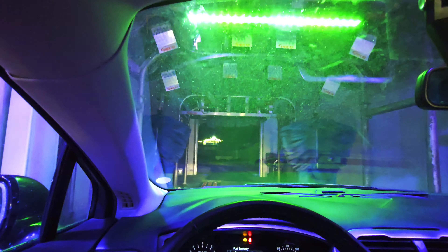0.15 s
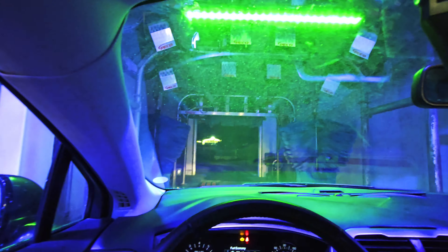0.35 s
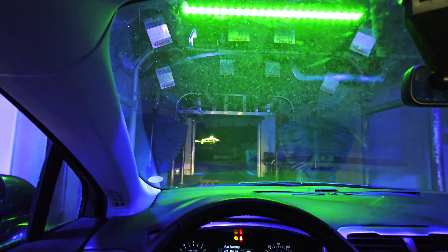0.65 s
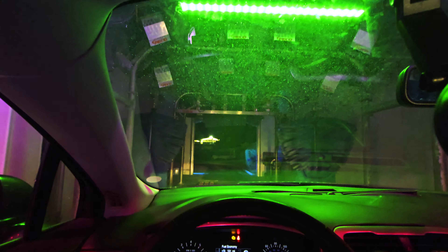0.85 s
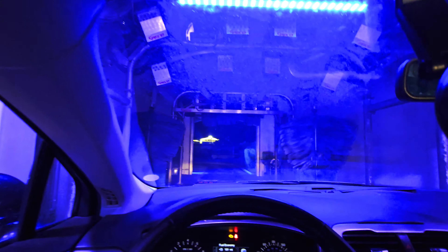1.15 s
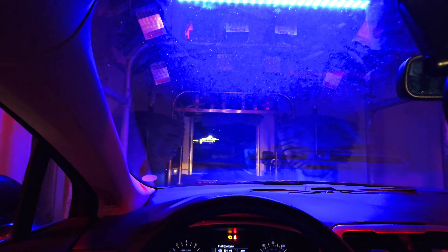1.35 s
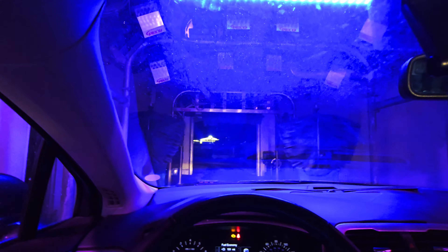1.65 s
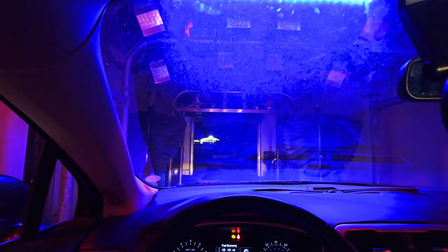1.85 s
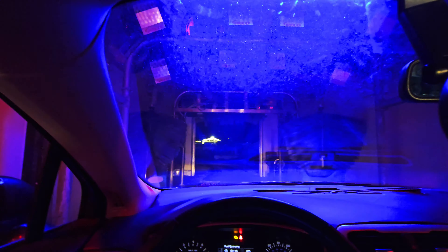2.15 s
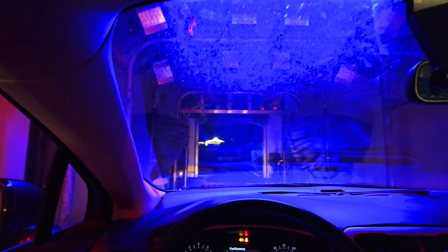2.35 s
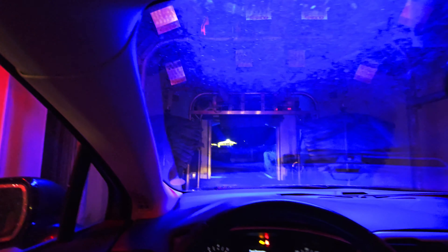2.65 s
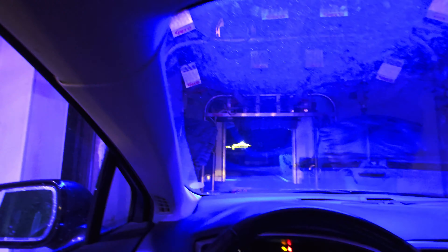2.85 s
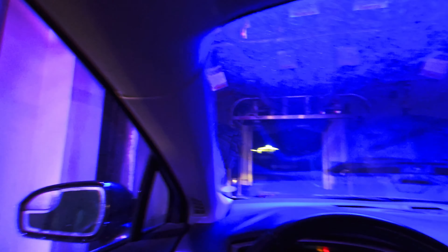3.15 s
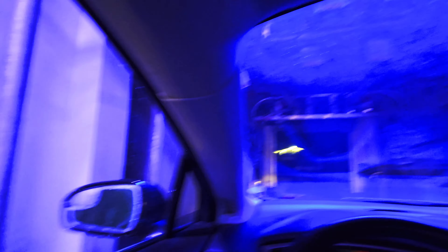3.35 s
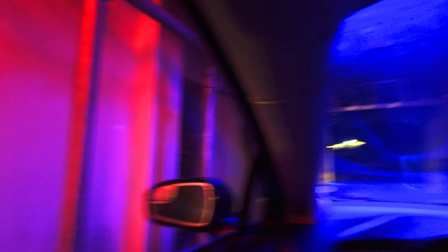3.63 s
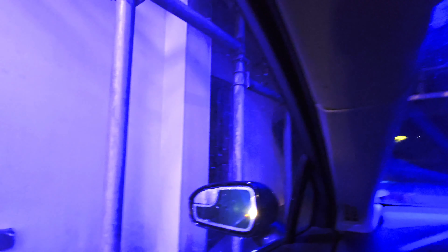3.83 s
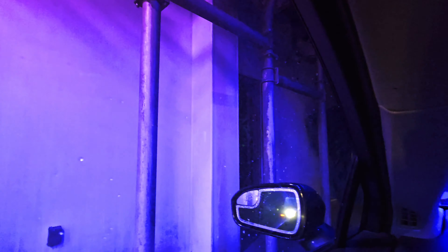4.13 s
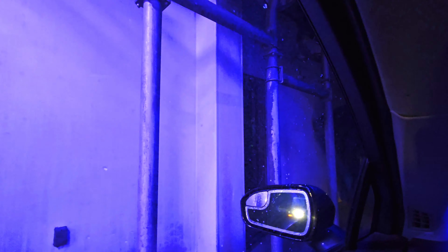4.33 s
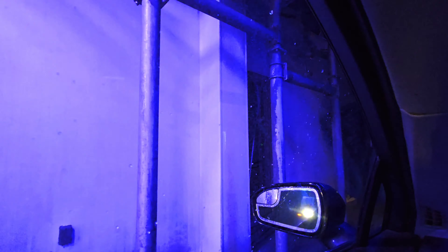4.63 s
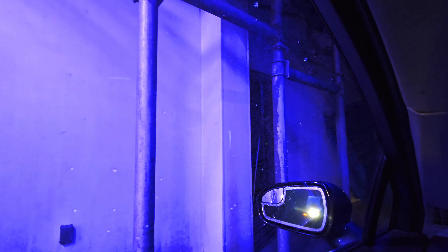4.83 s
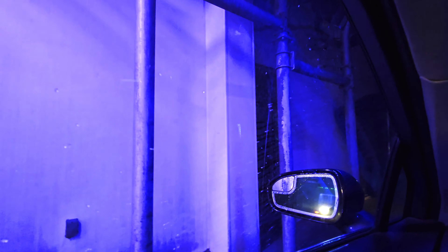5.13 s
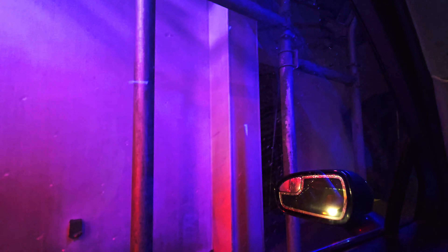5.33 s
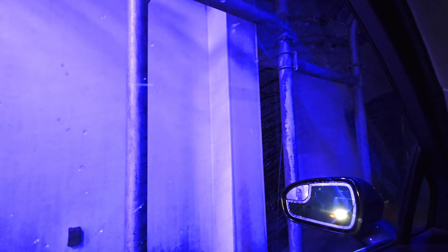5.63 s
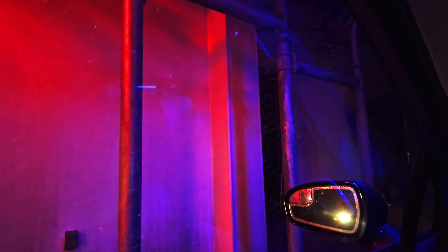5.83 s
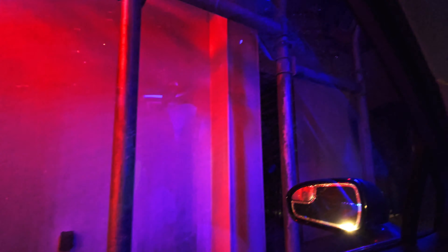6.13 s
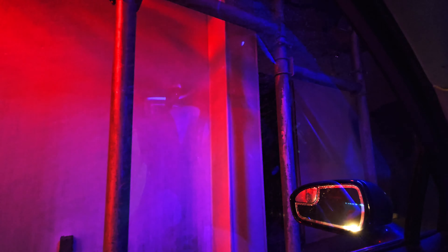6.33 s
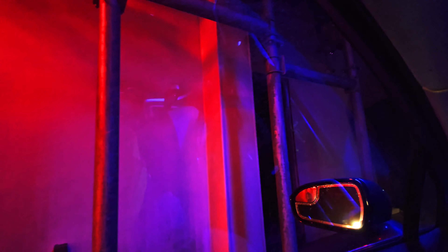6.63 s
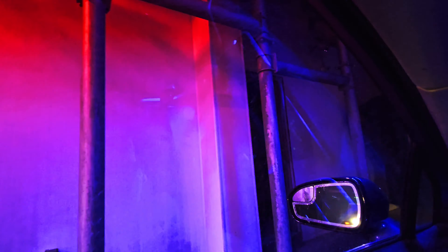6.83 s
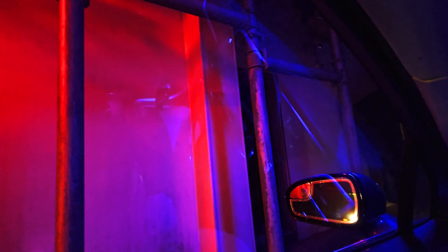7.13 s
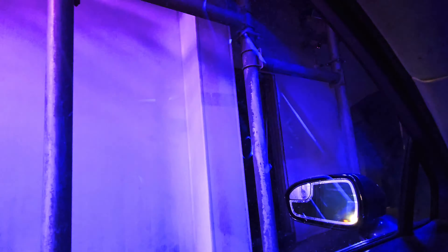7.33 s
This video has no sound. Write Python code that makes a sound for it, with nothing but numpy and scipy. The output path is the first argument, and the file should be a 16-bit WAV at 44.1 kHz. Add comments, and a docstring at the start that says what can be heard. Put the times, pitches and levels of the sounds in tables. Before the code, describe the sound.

From 0 seconds the noise is already full: air jets strike the windscreen with a broad fluttering roar, strongest in the first half second, over a low cabin boom and body drumming. Nozzle rush and softer hiss on wet glass lie above, with a wavering fan whine around 700 hertz and a second, slightly higher fan beating against it. From 1 to 2 seconds the roar thins while the boom becomes much heavier and gusty. A faint, fuzzy, high whistle lasts an instant near 2. Rush swells around 2.5 and the whine briefly stands out. From 3 to 4 the microphone turns toward the side window; hiss and tiny droplet ticks grow slightly clearer. Roof drumming deepens and strengthens through 6.5, with rush surging near 4.5. The fan tones keep swelling, sinking and shifting sideways. Everything continues steadily to the end at about 7.4 seconds.

```python
"""Inside a car that creeps under the dryer blowers of a wash tunnel.
Air jets make the cabin boom, roar on the windscreen and drum harder as they move onto the roof: shaped noise.
Through the glass come the rush and hiss of the nozzles (noise), the whine of two fans (wavering tones),
a fine spray of water (tiny clicks) and one brief whistle (a narrow band of noise)."""
import sys
import numpy as np
from scipy import signal
from scipy.fft import rfft, irfft
from scipy.io import wavfile
from scipy.ndimage import uniform_filter1d, minimum_filter1d

SR = 44100
rng = np.random.default_rng(int(sys.argv[2]) if len(sys.argv) > 2 else 0)


def wav_out(sig):
    """Save sig, one row per channel (or a flat mono array), as 16-bit PCM at SR to the path in sys.argv[1]."""
    wavfile.write(sys.argv[1], SR, np.round(np.clip(np.atleast_2d(sig).T, -1, 1) * 32767).astype(np.int16))


N = 329427
TIME = np.arange(N) / SR
HZ = np.fft.rfftfreq(N, 1 / SR)
HALVES = np.array([[.5], [-.5]])  # splits a difference evenly between left and right


def gain_of(db):
    """Turns decibels into an amplitude factor."""
    return 10 ** (np.asarray(db) / 20)


def evened(x):
    """Scales a sound to rms 1."""
    return x / np.sqrt(np.mean(x ** 2) + 1e-20)


def curve(rows, column=1):
    """Reads one column of a timed table at every sample, joined by straight lines."""
    columns = np.transpose(rows)
    return np.interp(TIME, columns[0], columns[column])


def read(points, hz):
    """Reads a spectrum, joined by straight lines over log frequency."""
    f, value = np.transpose(points)
    return np.interp(np.log(hz + 1), np.log(f + 1), value)


def wander(rate_hz):
    """A smooth random drift of rms 1, with little movement faster than the given rate."""
    coarse = TIME[::100]  # slow movement needs few points
    hz = np.fft.rfftfreq(len(coarse), coarse[1])
    spectrum = rfft(rng.standard_normal(len(coarse)))
    spectrum = spectrum * np.exp(-(hz / rate_hz) ** 2) * (hz > 0)
    slow = irfft(spectrum, len(coarse))
    return np.interp(TIME, coarse, evened(slow))


def steadied(x, seconds):
    """Evens out the loudness of a noise to about rms 1 over the given time."""
    power = uniform_filter1d(x.mean(0) ** 2, max(int(seconds * SR), 1))
    return x / np.sqrt(power + 1e-9)


def panned(x, left_db):
    """Leans a stereo pair to the left by a level difference."""
    return x * gain_of(HALVES * left_db)


def blend(first, second, share):
    """Passes from one noise to another at even power."""
    share = np.clip(share, 0, 1)
    return np.sqrt(1 - share) * first + np.sqrt(share) * second


def band(x, hz, width_hz):
    """Keeps the part of a sound around one frequency."""
    return irfft(rfft(x) * np.exp(-((HZ - hz) / width_hz) ** 2), N)


def hump(at_s, length_s, order=2):
    """A smooth rise to 1 and fall back; a higher order holds the top."""
    distance = np.minimum(abs(2 * (TIME - at_s) / length_s), 10)
    return np.exp(-distance ** order)


# how alike the two channels are in the cabin, where sound comes from all around: (frequency [Hz], coherence)
LIKENESS = [(40, 0.92), (130, 1), (290, 0.75), (630, 0.38), (1000, -0.013), (1390, -0.44), (2200, 0.24),
            (3050, -0.038), (6700, -0.0068), (14700, .01)]


def air(spectrum, skirt_db):
    """Turbulent noise at two ports, falling by skirt_db an octave outside its spectrum."""
    a, b = rfft(rng.standard_normal((2, N)))
    same = np.clip(read(LIKENESS, HZ), -1, 1)
    pair = np.array([a, same * a + np.sqrt(1 - same ** 2) * b])
    nearest_hz = np.clip(HZ, spectrum[0][0], spectrum[-1][0])
    octaves_outside = abs(np.log2((HZ + 1) / (nearest_hz + 1)))
    x = irfft(pair * gain_of(read(spectrum, HZ) - skirt_db * octaves_outside), N)
    return x / np.std(x.mean(0))


# the strongest gusts and lulls:
# (time [s], length [s], cabin boom [dB], roof drumming [dB], windscreen roar [dB])
GUST_TIMES = [(0.358, 0.72, 3, 1.5, -1.5), (0.727, 0.22, -8, -1.5, 3.5), (1.302, .2, 4.5, 0, 1.5),
              (1.5, .14, -3.5, -0.5, 0), (1.73, .35, 4, -3.5, -0.5), (2.245, 0.25, -4.5, 3, 1),
              (2.528, .2, 5.5, 1.5, 1), (2.757, 0.22, 8, 2, 0.5), (3.312, .18, -5.5, -0.5, -1),
              (3.52, 0.33, 2.5, 1.5, 1), (3.95, 0.23, 4.5, -0.5, 1.5), (4.167, 0.3, -2.5, 2.5, 1.5),
              (4.45, 0.48, 0.5, 1, 4), (4.944, .14, 2.5, 2, 2), (5.9, 0.68, -0.5, 2.5, 2),
              (6.463, 0.3, -1, 4, 1), (6.85, 0.5, 4.5, 0, 2), (7.054, .16, -4, 1, 0),
              (7.328, 0.48, 0, 2, 3.5)]


def gusts(column):
    """Gusts and lulls of the jets, in dB, on the part of the car in that column."""
    return sum(row[column] * hump(row[0], row[1]) for row in GUST_TIMES)


# how far the jets have moved from the windscreen onto the roof: (time [s], share [0-1])
JET_TRAVEL = [(0, 0), (1, 0.03), (2, 0.17), (3, 0.19), (4, 0.61), (5.5, 0.83), (6.4, 1), (7.4, 0.87)]


def off_glass():
    """How far the jets have left the windscreen, 0-1; they are off it early in their travel."""
    return np.clip(4.63 * curve(JET_TRAVEL), 0, 1)


# the low boom of the cabin: (frequency [Hz], relative level [dB per Hz])
CABIN_BOOM = [(20, -20.5), (30, -2.5), (38, 2), (45, 7.5), (53, -2), (66, -5.5)]


def buffeting(level_db=-26.0, rise_db=8.5, gusty_db=1.5, gusty_hz=14):
    """Gusts push on the body, harder off the glass, and the enclosed air booms at its lowest resonance."""
    boom = steadied(air(CABIN_BOOM, skirt_db=30), seconds=.09)
    push_db = level_db + rise_db * off_glass() + gusts(column=2) + gusty_db * wander(gusty_hz)
    return boom * gain_of(push_db)


# drumming with the jets at the front, then on the roof: (frequency [Hz], relative level [dB per Hz])
FRONT_PANELS = [(66, -12.5), (85, -10), (100, -8.5), (117, 0.5), (150, -6), (175, -1.5), (215, -8.5),
                (270, -11.5), (330, -22.5)]
ROOF_PANELS = [(62, -4.5), (79, 5), (102, -3.5), (135, -2), (170, -3.5), (210, -9), (243, -6), (300, -12),
               (360, -16.5)]
# the microphone turns from the windscreen to the side window: (time [s], share [0-1])
MIC_TURN = [(2.9, 0.29), (4, 0.7), (5.8, 1), (7.4, 0.55)]


def roof(level_db=-22.5, rise_db=4.0, gusty_db=0.5, gusty_hz=3, lean_db=3.5):
    """The body drums under the jets; other panels take over, louder, as the jets travel onto the roof."""
    front = air(FRONT_PANELS, skirt_db=36)
    overhead = air(ROOF_PANELS, skirt_db=42.0)
    drum = blend(front, overhead, curve(JET_TRAVEL))
    push_db = level_db + rise_db * curve(JET_TRAVEL) + gusts(column=3) + gusty_db * wander(gusty_hz)
    drum = steadied(drum, seconds=0.18) * gain_of(push_db)
    # long waves fill the cabin evenly; shorter ones come from the side window
    window = band(drum, hz=252, width_hz=69)
    return drum - window + panned(window, lean_db * curve(MIC_TURN))


# roar with the jets at the front, then on the roof: (frequency [Hz], relative level [dB per Hz])
FRONT_ROAR = [(310, 0), (352, 3), (395, -4.5), (445, -0.5), (510, -6), (580, -14.5), (690, -13.5),
              (850, -16.5), (950, -29)]
LATER_ROAR = [(320, -2.5), (400, -2.5), (470, -3), (570, -6), (660, -4), (760, -9), (850, -10.5),
              (950, -17)]


def windscreen(level_db=-34.0, fall_db=-5.0, head_on_db=9.5, head_on_s=0.57,
               follow=0.14, flutter_db=0.5, front_db=0.5):
    """The jets break on the glass with a fluttering roar, strong head on and thinning as they move on."""
    front = gain_of(front_db) * air(FRONT_ROAR, skirt_db=43.5)
    later = air(LATER_ROAR, skirt_db=42.0)
    roar = blend(front, later, off_glass())
    passing_db = head_on_db * np.exp(-(TIME / head_on_s) ** 2) + fall_db * curve(JET_TRAVEL)
    # follow: dB of roar per dB of nozzle rush
    stir_db = gusts(column=4) + follow * surge() + flutter_db * wander(2.7)
    return roar * gain_of(level_db + passing_db + stir_db)


# the nozzles, before the trims below: (time [s], rush level [dB], level of hiss on wet glass [dB])
NOZZLE_LEVELS = [(0.1, -45.5, -55.5), (1.14, -45.5, -55), (1.24, -42.5, -52.5), (1.7, -43.5, -53),
                 (1.95, -44, -53), (2.3, -43, -51.5), (2.5, -41.5, -51), (2.74, -43, -51.5),
                 (2.95, -45, -54), (3.72, -46, -54), (3.9, -45.5, -52.5), (4.36, -45, -53),
                 (4.48, -42, -51), (4.62, -45, -53.5), (5.3, -44.5, -54), (5.8, -44.5, -53.5),
                 (6.5, -44, -52.5), (7.05, -45, -52), (7.4, -44, -51)]
# their two sounds: (frequency [Hz], relative level [dB per Hz])
RUSH_SPECTRUM = [(900, -6), (1050, -1), (1250, 1), (1450, 3.5), (1600, 0), (1790, -6), (2150, -4.5),
                 (2360, -7), (2500, -6.5), (2750, -15)]
HISS_SPECTRUM = [(2700, -4), (3200, -4), (4300, -7.5), (5200, -9), (6000, -16), (6600, -18.5),
                 (7300, -17.5), (8000, -21.5), (9300, -21), (10500, -32.5), (12500, -28.5), (15000, -33)]


def nozzles(rush_trim_db=-0.57, hiss_trim_db=-2.0, flutter_db=0.5, leak_db=4.5):
    """Air tears out of the nozzles and hisses over the wet glass; both flutter together."""
    flutter = flutter_db * wander(21)
    rush = air(RUSH_SPECTRUM, skirt_db=38.5) * gain_of(curve(NOZZLE_LEVELS) + rush_trim_db + flutter)
    hiss_level = curve(NOZZLE_LEVELS, column=2) + hiss_trim_db + flutter
    hiss = air(HISS_SPECTRUM, skirt_db=45.5) * gain_of(hiss_level)
    # the thin side pane lets through a band where its bending waves match the sound in air
    leak = band(hiss, hz=3100, width_hz=790) * (gain_of(leak_db * curve(MIC_TURN)) - 1)
    return rush + hiss + leak


def surge():
    """The rush of the nozzles in dB above its mean."""
    rush = curve(NOZZLE_LEVELS)
    return rush - rush.mean()


def whine(turns, harmonic=1, lead=0., scatter_hz=9, rough_hz=30):
    """A blade tone at two ports: its direction drifts, wall echoes make it waver, turbulence roughens it."""
    swirl, echo = .42, .38  # drift of each port [radians rms], strength of the wall echoes
    rough = .16 * harmonic  # higher harmonics are smeared more
    drift = swirl * np.array([wander(0.94), wander(0.96)])
    direct = np.exp(1j * (HALVES * lead + drift))
    echoes = np.array([wander(scatter_hz) + 1j * wander(scatter_hz) for side in range(2)])
    eddies = np.array([wander(rough_hz) + 1j * wander(rough_hz) for side in range(2)])
    path = direct + echo * echoes + rough * eddies
    # the fan's power holds steady from moment to moment, however its tone flutters
    power = uniform_filter1d((abs(path) ** 2).mean(0), int(.1 * SR))
    return (path / np.sqrt(power) * np.exp(2j * np.pi * harmonic * turns)).real


# the harmonics of the blade rate, lowest first: (level [dB], gain once the jets are off the windscreen [dB],
# gain at the side window [dB], lift [dB per dB of nozzle rush], lead of the left port [radians])
BLADE_TONES = [(-46.5, 3.5, -2.3, 0.1, -0.2), (-55.5, 5.5, 4, -0.2, 2.4), (-61.5, 2, -0.5, 1.2, 0.5),
               (-65.5, 0, 3, 0.3, 1.4)]
# harmonics swell or sink where the car crosses loud or quiet spots of the fans' sound field:
# (time [s], length [s], harmonic [number], level change [dB], left-right difference [dB])
TONE_SWELLS = [(2.55, .6, 1, 7, 0), (2.42, .14, 1, 2.5, 0), (3.85, .4, 1, -8, 0), (4.28, .22, 1, 4, -4),
               (4.63, .3, 1, 6, 0), (4.98, .35, 1, 2.5, 7), (5.29, .14, 1, -10, 0), (5.98, .17, 1, 4, 8),
               (6.33, .24, 1, 5, 0), (6.65, .16, 1, -5, 0), (1.29, .3, 2, 8, 0), (1.97, .42, 2, 9.5, 1),
               (2.51, .16, 2, 9, 3), (3.87, .14, 2, 2, 5), (4.48, .11, 2, 3, 4), (4.18, .12, 2, -8, 0),
               (4.66, .13, 2, 6, 0), (4.83, .1, 2, 2.5, 4), (5.01, .15, 2, 4, 4), (6.23, .14, 2, 3.5, -3),
               (6.49, .22, 2, 7.5, 4), (6.78, .16, 2, 4, 5), (7.27, .35, 2, 2.5, 0),
               (1.88, .36, 3, 5.5, -7), (2.43, .24, 3, 6, -8), (6.17, .16, 3, 8, 2),
               (6.58, .18, 3, 11.5, 5), (2.08, .26, 4, 5, 5), (5.9, .7, 4, 7, 5)]
# the main fan swings about the head as the car creeps and the microphone turns:
# (time [s], extra lead of the left port at the blade rate [radians])
FAN_BEARING = [(2.5, 0), (3.5, -.15), (4.75, -.7), (5.6, -.2), (6.5, -.05)]


def fans(fan_hz=707.6, second_fan_hz=716.2, drift_hz=0.448, second_db=-44.0, second_fall_db=-6.0):
    """The main fan whines on four harmonics; a slightly faster one beats against it and is left behind."""
    turns = np.cumsum(fan_hz + drift_hz * wander(1.47)) / SR  # blade passes so far
    second_level = second_db + second_fall_db * curve(JET_TRAVEL)
    out = gain_of(second_level) * whine(second_fan_hz * TIME)
    for k, (db, overhead_db, side_db, lift, lead) in enumerate(BLADE_TONES, 1):
        level = db + overhead_db * off_glass() + side_db * curve(MIC_TURN) + lift * surge()
        tone = whine(turns, k, lead + k * curve(FAN_BEARING)) * gain_of(level)
        for s, length, harmonic, swell_db, left_db in TONE_SWELLS:
            if round(harmonic) == k:
                spot = hump(s, length, order=3)
                tone = panned(tone, left_db * spot) * gain_of(swell_db * spot)
        out = out + tone
    return out


def spray(per_s=300, spread_db=3.0, level_db=-73.5, side_db=3, centre_hz=6500):
    """Blown droplets tick on the glass, clearest at the side window; most are tiny."""
    ticks = np.zeros((2, N))
    spots = 8  # each spot on the glass has its own colour of tick
    for spot in range(spots):
        sizes = gain_of(spread_db * np.minimum(rng.exponential(1, N), 5))
        drops = sizes * (rng.random(N) < per_s / spots / SR)
        t = TIME[:256]
        tick = rng.standard_normal((2, len(t))) * np.exp(-t / .0006)
        ticks += signal.oaconvolve(drops[None], tick, axes=1)[:, :N]
    blast = curve(NOZZLE_LEVELS, column=2)
    level = level_db + side_db * curve(MIC_TURN) + blast - blast.mean()
    return evened(band(ticks, centre_hz, width_hz=3600)) * gain_of(level)


def whistle(at_s=1.96, length_s=.14, pitch_hz=1995, level_db=-49, width_hz=22):
    """The jet catches an edge of the car and briefly sings a fuzzy note."""
    note = evened(band(rng.standard_normal((2, N)), pitch_hz, width_hz))
    return note * gain_of(level_db) * hump(at_s, length_s)


def scene():
    """Everything as it arrives in the cabin."""
    return buffeting() + roof() + windscreen() + nozzles() + fans() + spray() + whistle()


# how the microphone's shell shades its two ports: (frequency [Hz], left-right difference [dB])
PORT_SHADE = [(60, 1.4), (160, 2.6), (220, 3.4), (310, 3.2), (420, 1.3), (540, 2), (1100, -.2), (1450, 1.2),
              (1800, -1), (2850, 4.8), (3700, 2), (5000, -2), (6700, 2), (9300, 2), (10500, 0)]


def record(dry, ceiling=.95, edge_hz=15200):
    """The shading of the two ports, a limiter that eases the largest peaks, then a cut of the top treble."""
    ports = irfft(panned(rfft(dry), read(PORT_SHADE, HZ)), N)
    allowed = np.minimum(1, ceiling / (abs(ports).max(0) + 1e-9))
    # the gain dips smoothly around each peak
    held = minimum_filter1d(allowed, size=1801)
    gain = uniform_filter1d(uniform_filter1d(held, size=901), size=901)
    lowpass = signal.firwin(511, edge_hz, window=("kaiser", 9), fs=SR)
    return signal.oaconvolve(ports * gain, lowpass[None], "same", axes=1)


dry = scene()
out = record(dry)
wav_out(out)
```